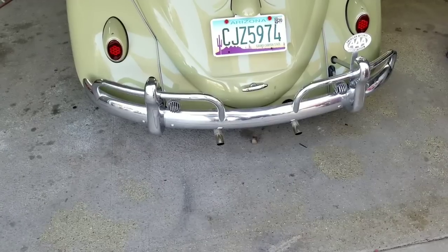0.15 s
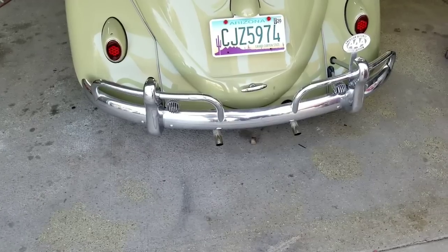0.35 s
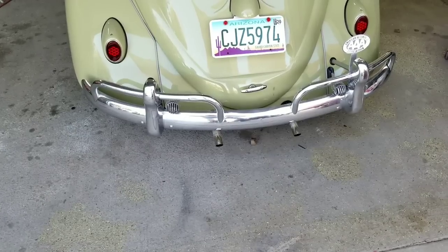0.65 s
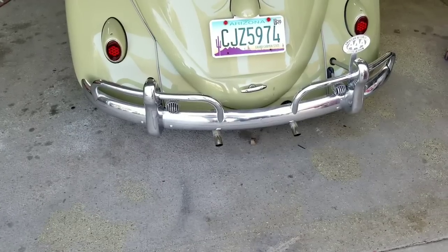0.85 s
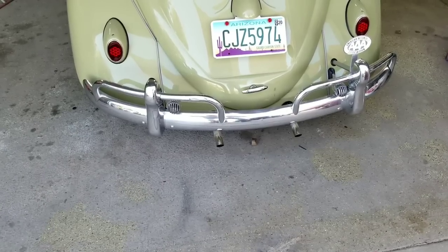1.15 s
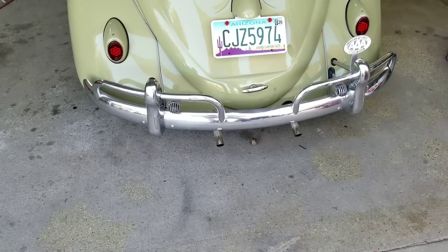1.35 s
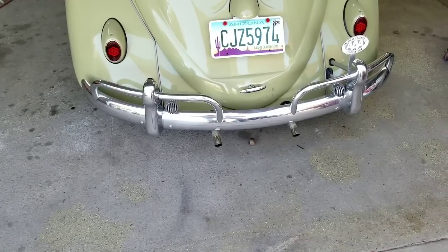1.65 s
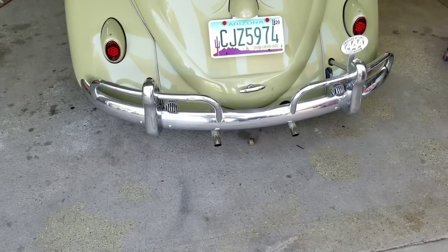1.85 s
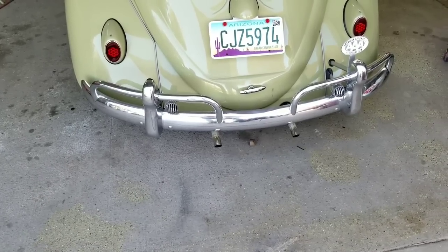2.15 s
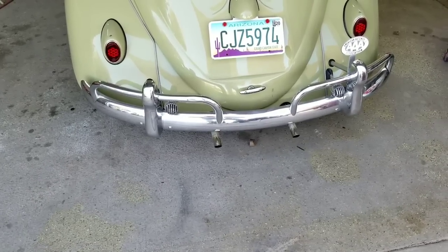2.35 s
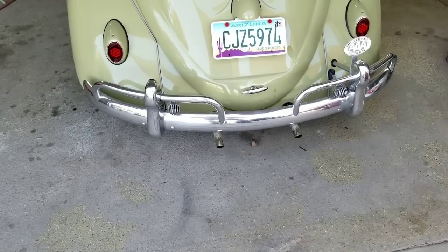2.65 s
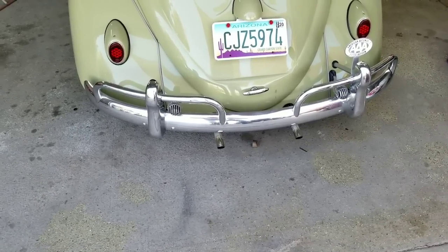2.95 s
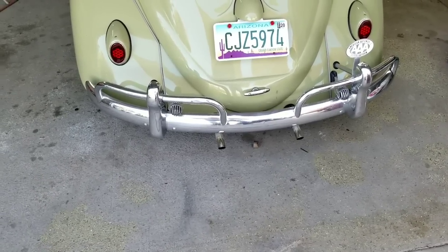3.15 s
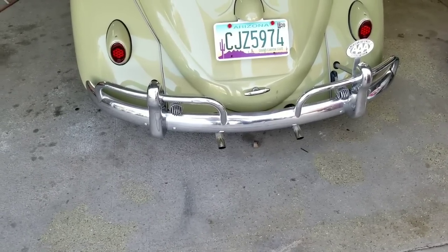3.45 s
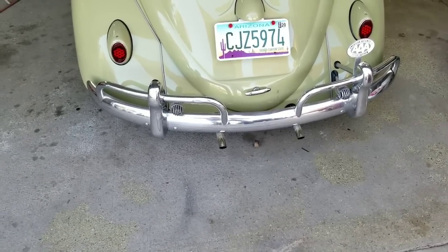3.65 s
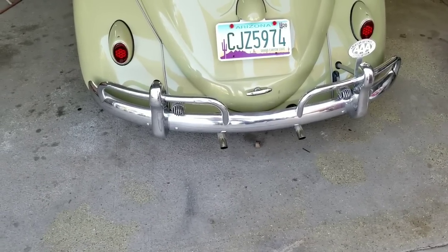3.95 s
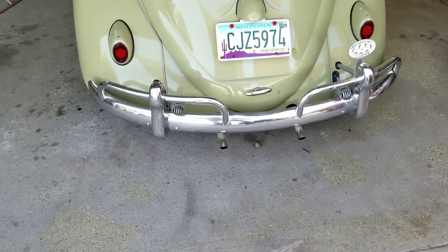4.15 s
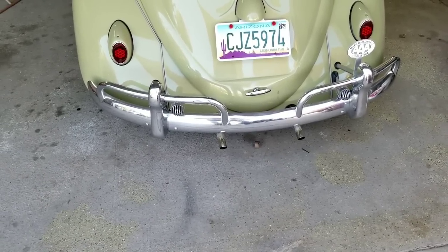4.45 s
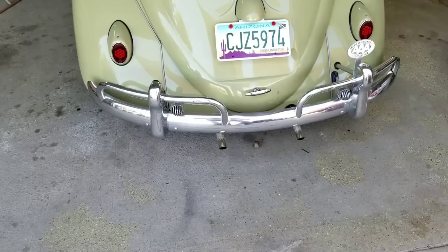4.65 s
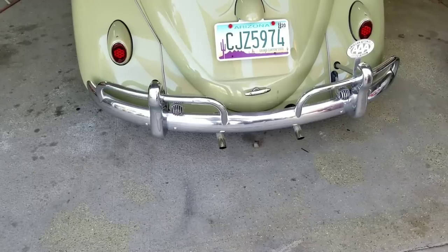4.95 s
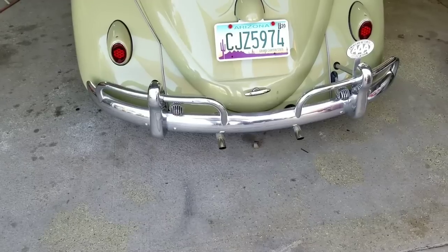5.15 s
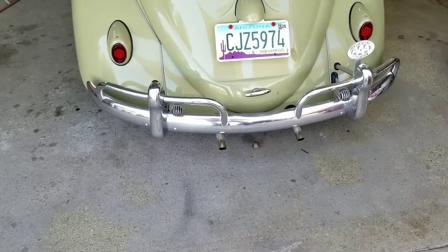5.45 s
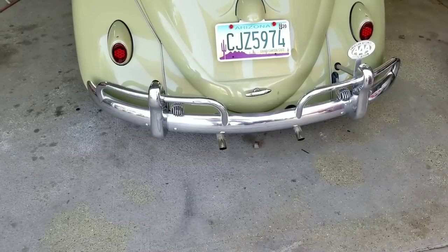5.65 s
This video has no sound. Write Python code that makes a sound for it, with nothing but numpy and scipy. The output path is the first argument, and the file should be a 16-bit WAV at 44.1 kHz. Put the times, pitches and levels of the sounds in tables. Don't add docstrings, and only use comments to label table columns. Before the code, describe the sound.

Rapid low exhaust thumps with bright hissing, whistling puffs run evenly, falter into uneven gaps with one hollow cough, then pick up speed.

```python
import sys
import numpy as np
from scipy import signal
from scipy.fft import rfft, irfft, next_fast_len
from scipy.io import wavfile
from scipy.ndimage import uniform_filter1d

SR = 44100
rng = np.random.default_rng(int(sys.argv[2]) if len(sys.argv) > 2 else 0)


def level_to_linear(level):
    exponent = np.asarray(level, float) / 20
    return 10 ** exponent


def transcribe(u):
    v = np.clip(np.atleast_2d(u).T, -1, 1)
    q = np.round(v * 32767).astype(np.int16)
    wavfile.write(sys.argv[1], SR, q)


N = 255320

# (time [s], firings so far [count])
CRANK_POINTS = [(.0068, 0), (.7275, 31), (1.8168, 76), (2.1634, 89), (2.6138, 105), (3.3081, 127),
                (3.4415, 131), (4.266, 150), (4.3266, 151), (4.4113, 152), (4.466, 153), (4.6784, 157),
                (4.7663, 159), (4.8648, 162), (5.0593, 170), (5.3914, 185), (5.4927, 189), (5.796, 200)]


def crank_times(count):
    s, n = np.transpose(CRANK_POINTS)
    slope = np.gradient(s, n)
    i = np.clip(np.searchsorted(n, count, "right") - 1, 0, len(n) - 2)
    span, rise = np.diff(n)[i], np.diff(s)[i]
    u = (count - n[i]) / span
    bend_start = span * slope[i] - rise
    bend_end = span * slope[i + 1] - rise
    return s[i] + u * rise + u * (1 - u) * ((1 - u) * bend_start - u * bend_end)


def firings():
    # (time [s], jet [dB], thump [dB], bark [dB])
    burn = np.array([(0.0, -22.5, -19, -37), (.4, -22, -20.5, -34.5), (1.2, -21, -19, -37),
                     (1.6, -23.5, -21.5, -35.5), (2.0, -22, -19.5, -38), (2.581, -22, -20.5, -39.5),
                     (2.61, -15, -19, -28), (3.45, -14.5, -23, -32), (3.85, -20, -27.5, -33),
                     (4.1, -16, -26.5, -39), (4.35, -14.5, -29.5, -30.5), (4.8, -14.5, -27.5, -32.5),
                     (4.97, -14.5, -27, -22), (5.19, -18, -27, -26), (5.25, -19.5, -35.5, -29.5),
                     (5.45, -22, -27.5, -34.5), (5.6, -23.5, -28.5, -31), (5.79, -23.5, -27.5, -34)])
    # (jet lateness [s], jet [dB], thump [dB], bark [dB])
    cylinders = np.array([(0.0013, 5, -2.5, 2.5), (0.00054, 3.5, -1.45, 9.5), (0.0026, 5.5, -1, 0),
                          (0.0024, 6, -1.9, 7.5)])
    # (jet [dB], thump [dB], bark [dB], low tips [dB], whistle [dB])
    uneven = np.array([(3.5, -4.5, -14.5, -7, 1.5), (-1.5, -1.5, 3.5, 0.5, -2), (3, -1, -7, -2, 4),
                       (0.5, -2, 0, 7, 5.5)])
    # (start [s], end [s], jet loss [dB], thump loss [dB])
    misfires = [(2.81, 2.84, 14, -2.5), (3.0, 3.03, 23, 0), (3.065, 3.095, 31, 6), (3.26, 3.29, 25, 6),
                (3.325, 3.355, 37, 19), (3.53, 3.56, 19, 14), (3.6, 3.635, 37, 24), (3.755, 3.795, 20, 4),
                (3.885, 3.925, 27.5, 4), (4.02, 4.07, 30, 25), (4.12, 4.3, 55, 36), (4.36, 4.44, 34, 16),
                (4.55, 4.65, 39, 9), (5.045, 5.115, 27, 10), (5.222, 5.243, 33, 11), (5.265, 5.38, 22, 6),
                (5.505, 5.53, 24, 7), (5.56, 5.585, 26, 16)]
    # (time [s], extra jet [dB], extra bark [dB], extra whistle [dB])
    single_burns = [(2.674, -1.5, -1.5, 2), (2.764, -3, 4, -6), (2.92, 1, 2, -2), (4.865, -6, 1, -1),
                    (3.047, -4, 3, 4.5), (3.113, 1.5, 6, 0.5), (3.24, -1.5, 2, 1), (3.307, -1, 2, -10),
                    (3.477, -2.5, -15, 6), (3.583, -3, 3.5, 5.5), (3.657, 0.5, 3, -16), (3.696, 1, 5, -1),
                    (3.735, 2, 0.5, -2), (3.817, -1, -3, -9), (3.949, -3, 8, 2.5), (4.096, 0, 12, 1.5),
                    (4.894, 2, 1.5, -1), (4.521, -1, 0, -11), (4.679, 1.5, 0, -1), (4.803, 2.5, 12, 0),
                    (5.127, 4, -2, 5), (5.546, 3, 4, 1), (4.971, -2, -11, 2), (4.992, -4.5, -2, -12),
                    (5.035, -10, -8, 9.5), (5.149, -2, -1, -5), (5.193, 0.5, -6, 6.5), (5.392, -4, -2.5, -5),
                    (5.601, 2, -5, -7), (5.685, 2.5, -1.5, 3.5)]
    stumble_s = 2.6
    bark_loss = 0.63

    count = np.arange(-1, CRANK_POINTS[-1][1])
    cylinder = count % 4
    s = crank_times(count)
    even = s < stumble_s
    strength = [np.interp(s, burn[:, 0], burn[:, k]) for k in (1, 2, 3)]
    rows = np.column_stack([s] + strength + [0 * s, 0 * s])
    rows[even, 1:4] += cylinders[cylinder[even], 1:]
    rows[~even, 1:] += uneven[cylinder[~even]]

    chance = rng.standard_normal((len(s), 6))
    spread_db = np.where(even[:, None], [1.43, 0.5, 1.1, 1.6, 2.2], [1.72, 1.5, 1.4, 0.93, 0.55])
    rows[:, 1:] += chance[:, 1:] * spread_db
    for start, end, jet_db, thump_db in misfires:
        rows[(start < s) & (s < end), 1:4] -= [jet_db, thump_db, bark_loss * jet_db]
    for at, *extra_db in single_burns:
        rows[np.argmin(abs(s - at)), [1, 3, 5]] += extra_db
    late = even * (cylinders[cylinder, 0] + 0.00099 * chance[:, 0])
    return rows, late


def jets(fire, late):
    # (frequency [Hz], level per Hz [dB])
    jet_colour = [(880, -11), (1500, -70), (2640, -4.5), (3180, -6.5), (4710, -7), (6310, -2.5), (12700, 3),
                  (14600, 0.5), (15500, -30)]
    # (frequency [Hz], width [Hz], level [dB])
    tip_modes = [(2623, 860, -7.5), (3490, 120, -4.5), (4700, 530, 1.5), (5535, 430, -2), (6925, 97, 2.5),
                 (7875, 110, 1), (9430, 830, -7.5), (11470, 230, -3), (12540, 3200, -2), (12640, 350, -3),
                 (13600, 410, -0.5)]
    # (frequency [Hz], width [Hz], level [dB])
    shriek_modes = [(10800, 600, -2), (11500, 600, 0), (12500, 700, -6)]
    # (frequency [Hz], width [Hz], level [dB])
    bark_modes = [(825, 460, -24.5), (1086, 62, -1), (1151, 116, 7), (1237, 150, 5)]

    s, jet_db, thump_db, bark_db, low_db, whistle_db = fire.T
    s = s + late - .015
    flow = puff(rise_s=.0034, fall_s=.003, tail_s=.016, tail_db=-8.0)
    peak = puff(rise_s=.0016, fall_s=.0016, tail_s=0.026, tail_db=-15.5)
    crack = puff(rise_s=0.0014, fall_s=0.0072, tail_s=0.012, tail_db=-3.0)

    body_db = jet_db - 0.71 * np.maximum(whistle_db, 0)
    hiss = level_to_linear(-5) * stereo_noise(jet_colour) * train(s, body_db + .4 * low_db, flow)
    low_tips = np.array(tip_modes)[:, 0] < 6000
    tips_db = body_db[:, None] + np.outer(0.83 * low_db, low_tips)
    tips = level_to_linear(1.5) * whistles(s, tips_db, tip_modes, flow, spread_db=3.0)
    shriek_db = np.outer(jet_db + 2.08 * whistle_db, np.ones(len(shriek_modes)))
    shriek = level_to_linear(-5.0) * whistles(s, shriek_db, shriek_modes, peak, spread_db=0.5)
    each_bark_db = np.outer(bark_db, np.ones(len(bark_modes)))
    bark = level_to_linear(4.0) * whistles(s - .004, each_bark_db, bark_modes, crack, spread_db=-0.56)
    return hiss + tips + shriek + bark


def whistles(times, db, modes, shape, spread_db):
    steady = 0.53
    white, out = stereo_noise([(20, 0), (20000, 0)]), 0
    odd = spread_db * rng.standard_normal((len(times), len(modes)))
    power = sum(level_to_linear(2 * level_db) * width_hz for hz, width_hz, level_db in modes)
    for k, (hz, width_hz, level_db) in enumerate(modes):
        tone = resonate(white, hz, width_hz)
        swell = uniform_filter1d(tone ** 2, round(.3 * SR / width_hz))
        swell = swell / np.mean(tone ** 2, axis=1, keepdims=True)
        tone = rms_one(tone / (swell + .05) ** (steady / 2)) * np.sqrt(width_hz)
        gate = train(times, db[:, k] + level_db + odd[:, k], shape)
        out = out + resonate(tone * gate, hz, width_hz)
    return out / np.sqrt(power)


def puff(rise_s, fall_s, tail_s, tail_db):
    t = np.arange(SR // 8) / SR - .015
    after = np.clip(t, 0, 1)
    fall = np.exp(-after / fall_s) + level_to_linear(tail_db) * np.exp(-after / tail_s)
    rise = np.where(t < 0, np.exp(-.5 * (t / rise_s) ** 2), 1)
    return rise * fall / (1 + level_to_linear(tail_db))


def thumps(fire):
    # (frequency [Hz], t60 [s], left bank [dB], right bank [dB])
    pipes = [(40, .12, -6, -12), (83.4, .07, 8.8, 5.8), (104, .07, 9, 5.3), (204, .25, -19, -26),
             (141, .04, -10, 9), (265, .06, -19, -17), (62, .12, -16, -16)]
    t, out = np.arange(SR // 4) / SR, 0
    opening = 1 - np.exp(-t / .002)
    spread_db = np.where(fire[:, :1] > 2.9, 1.5, .4)
    odd = rng.standard_normal((len(fire), len(pipes))) * spread_db
    left_bank = np.arange(len(fire)) % 2
    gap_s = np.gradient(fire[:, 0])
    for k, (hz, t60, left_db, right_db) in enumerate(pipes):
        ring = (-1) ** k * np.sin(2 * np.pi * hz * t) * level_to_linear(-60 * t / t60) * opening
        db = fire[:, 2] + np.where(left_bank, left_db, right_db) + odd[:, k]
        if 50 < hz < 70 or hz > 130:
            db += np.interp(gap_s, [.026, .032], [0, 17.5 if hz < 70 else -4.0])
        out = out + train(fire[:, 0] - .0058, db, ring)
    return out


def cough():
    # (time [s], peak level [dB], frequency [Hz], swell [s], t60 [s])
    intake_rings = [(4.4525, -11.5, 372, .013, .05), (4.454, -33, 640, .006, .07),
                    (4.455, -27, 490, .01, .09), (4.456, -33, 880, .005, .06), (4.472, -32, 800, .006, .07),
                    (4.482, -16, 385, .006, .045), (4.5, -23, 375, .022, .045), (4.535, -38, 345, .04, .09),
                    (4.59, -44, 395, .015, .1), (4.4633, -17, 372, .009, .03)]
    age, out = np.arange(SR // 4) / SR, 0
    for s, db, hz, swell_s, t60 in intake_rings:
        swell = np.sin(np.pi / 2 * np.minimum(age / swell_s, 1))
        decay = level_to_linear(-60 * np.maximum(age - swell_s, 0) / t60)
        out = out + train(np.array([s]), np.array([db]), swell * decay * np.sin(2 * np.pi * hz * age))
    return out


def clatter(fire):
    # (frequency [Hz], level per Hz [dB])
    tin_colour = [(530, -14.5), (900, -5), (1080, -15), (1380, -6), (1770, -10), (12700, -16.5), (14800, 1),
                  (15500, -49)]
    # (frequency [Hz], level per Hz [dB])
    rumble_colour = [(25, -31), (45, -3), (97, -21), (157, -3.5), (230, -10), (314, -12.5), (374, -13.5),
                     (494, -24), (1000, -12), (1300, -32)]
    # (frequency [Hz], level per Hz [dB])
    slab_colour = [(25, -6), (42, -6), (62, 1), (90, -14), (200, -60)]
    full_speed_hz, shake_s = 41.8, 0.049
    dead_db = 10.5

    t, s = np.arange(N) / SR, fire[:, 0]
    halvings = np.interp(t, s, np.log2(full_speed_hz * np.gradient(s)))
    burn_db = np.maximum(fire[:, 2] - fire[0, 2], -dead_db)
    swing_db = uniform_filter1d(np.interp(t, s, burn_db), round(shake_s * SR))
    tin_db = -21.5 - 9.5 * halvings + 1.11 * swing_db
    rumble_db = -35 - 5.5 * halvings + 0.61 * swing_db
    slab = level_to_linear(-44) * stereo_noise(slab_colour).mean(axis=0)
    tin = level_to_linear(tin_db - 5.5) * stereo_noise(tin_colour)
    rumble = level_to_linear(rumble_db + 1.5) * stereo_noise(rumble_colour)
    return slab + tin + rumble


def garage(x):
    # (frequency [Hz], level per Hz [dB])
    wash_colour = [(410, -50), (700, -10.5), (1130, -7.5), (1690, -6.5), (2560, 4.5), (3190, -4), (3920, 5),
                   (4700, 5.5), (6260, -0.5), (6850, 2), (9720, -4), (11400, -5), (12800, 5.5), (14500, -4),
                   (15500, -28)]
    t60_s, wash_db = 0.28, -10
    keep = level_to_linear(-120 / (t60_s * SR))
    power = signal.lfilter([1 - keep], [1, -keep], np.mean(x ** 2, axis=0))
    late = np.append(np.zeros(round(0.001 * SR)), power)[:N]
    return level_to_linear(wash_db) * np.sqrt(late) * stereo_noise(wash_colour)


def stereo_noise(spectrum):
    # (frequency [Hz], likeness [0-1])
    likeness = [(60, 0.4), (130, .98), (290, 0.82), (640, 0.46), (1410, 0.6), (3100, 0.58), (6300, 0.12),
                (10000, 0.37), (12500, 1), (15000, 0.7)]
    # (frequency [Hz], left minus right [dB])
    lean = [(60, 4.5), (110, 5.5), (200, 2), (380, 0.5), (700, 2), (1290, -6), (2380, 0.5), (4400, 1.5),
            (8120, 2), (15000, 3)]
    # (frequency [Hz], phase [rad])
    lead = [(60, 0), (1200, -.5), (2800, -.7), (3800, 1.2), (5200, 2.0), (6300, 3.0), (7800, 1.5),
            (9500, .4), (11400, -.6), (12600, -1.5), (15000, -2.0)]
    size = next_fast_len(N)
    hz = np.fft.rfftfreq(size, 1 / SR)
    mid, side = rfft(rng.standard_normal((2, size)))
    alike = np.clip(at_hz(likeness, hz), 0, 1)
    half = np.array([[.5], [-.5]])
    pair = np.sqrt(1 + alike) * mid + np.sqrt(1 - alike) * side * [[1], [-1]]
    pair = pair * level_to_linear(at_hz(spectrum, hz) + at_hz(lean, hz) * half)
    pair = pair * np.exp(1j * at_hz(lead, hz) * half)
    return rms_one(irfft(pair, size)[:, :N])


def at_hz(points, hz):
    point_hz, value = np.transpose(points)
    return np.interp(np.log(np.maximum(hz, 1)), np.log(point_hz), value)


def rms_one(x):
    return x / np.sqrt(np.mean(x ** 2) + 1e-20)


def resonate(x, hz, width_hz):
    r = np.exp(-np.pi * width_hz / SR)
    poles = [1, -2 * r * np.cos(2 * np.pi * hz / SR), r * r]
    return signal.lfilter([(1 - r * r) / 2, 0, (r * r - 1) / 2], poles, x)


def train(times, db, shape):
    margin = SR // 2
    out = np.full(N + 2 * SR, 1e-9)
    starts = np.round(times * SR).astype(int) + margin
    for at, gain in zip(starts, level_to_linear(db)):
        out[at:at + len(shape)] += gain * shape
    return out[margin:margin + N]


def scene():
    fire, late = firings()
    bright = jets(fire, late)
    low = thumps(fire) * level_to_linear(np.array([[-.2], [.2]]))
    return bright + garage(bright) + cough() + low + clatter(fire)


def roll_off(x):
    return signal.sosfilt(signal.butter(12, 15000, fs=SR, output="sos"), x)


def record(dry):
    rounded = 1.02 * np.tanh(dry / 1.02)
    cut = signal.sosfilt(signal.cheby2(12, 70, 16060, fs=SR, output="sos"), rounded)
    cut = signal.sosfilt(signal.butter(2, 18, "high", fs=SR, output="sos"), cut)
    return roll_off(cut)


dry = scene()
out = record(dry)
transcribe(out)
```